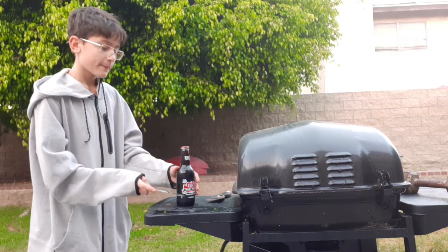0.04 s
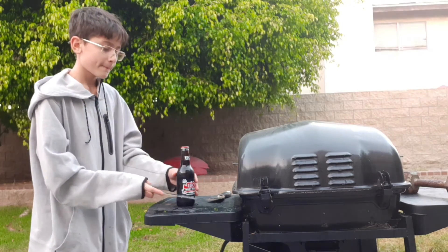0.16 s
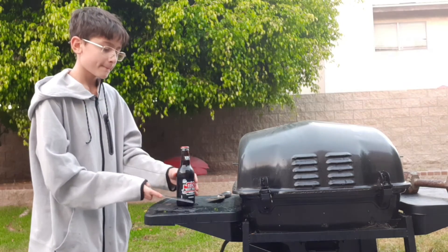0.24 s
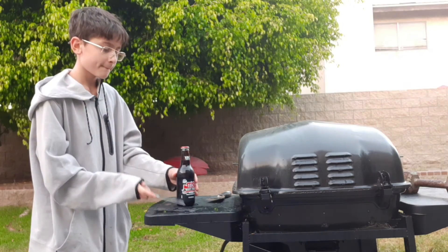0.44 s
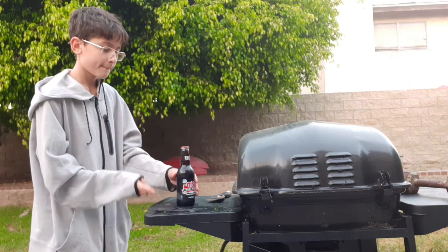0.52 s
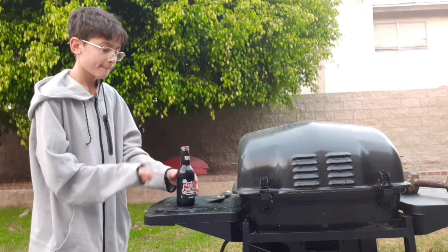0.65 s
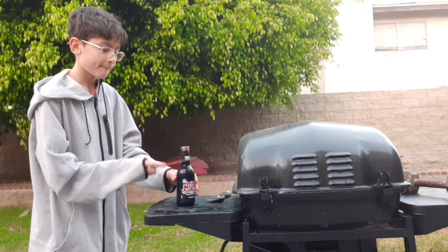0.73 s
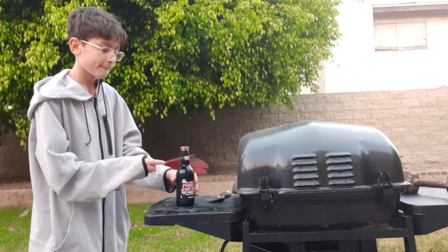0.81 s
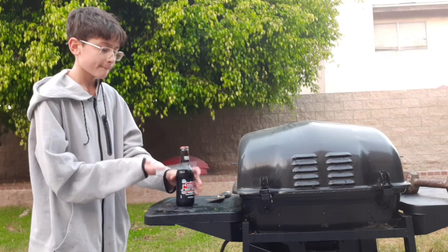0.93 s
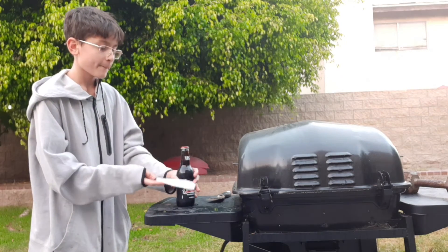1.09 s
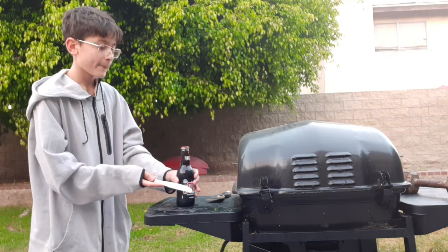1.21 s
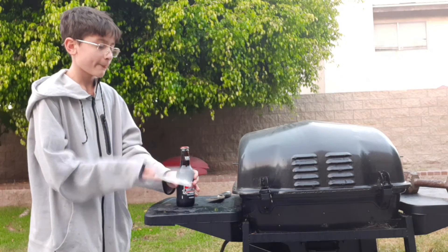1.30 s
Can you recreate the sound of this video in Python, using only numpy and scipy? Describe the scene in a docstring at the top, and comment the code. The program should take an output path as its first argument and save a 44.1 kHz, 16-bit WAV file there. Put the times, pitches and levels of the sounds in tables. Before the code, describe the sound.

Two bright clinks ring from a glass bottle tapped with a metal utensil close by. After a short pause with a faint rub, two higher clinks follow and fade over a quiet outdoor rumble.

```python
"""A glass bottle, held on a barbecue's side shelf, struck with a metal utensil: two quick blows low on
its body (the second rebounds), then two higher up. Each blow cracks, sets off a short dense shimmer
and leaves a few clear modes ringing, until the hand tightens on the low ones. Utensil and sleeve rub
lightly, the sheet-metal shelf hums, and the yard walls answer over a faint outdoor rumble."""
import sys
import numpy as np
from scipy import signal
from scipy.fft import rfft, irfft
from scipy.io import wavfile

SR = 44100
rng = np.random.default_rng(int(sys.argv[2]) if len(sys.argv) > 2 else 0)


def pcm_store(signal):
    """Save signal as 16-bit PCM."""
    levels = np.round(np.clip(np.atleast_2d(signal), -1, 1) * 32767)
    wavfile.write(sys.argv[1], SR, levels.astype(np.int16).T)


N = 59535

# utensil blows, third a rebound: t/s, ring level/dB, place (0 low, 1 high), ring tilt/(dB/oct),
# shimmer level/dB, shimmer tilt/(dB/oct), crack level/dB, ring t60 factor
BLOWS = [(0.2285, 1, 0.098, 3, -25.5, -3, -20, 0.77), (.3366, -2, 0.18, 1, -23.5, .5, -15, 0.68),
         (.3484, -10, 0, 12.5, -31.5, 2.5, -26, 0.67), (0.7604, 2, 0.93, 1, -25, -1.5, -20, 0.75),
         (.8787, -4, 0.91, -0.5, -29, -2.5, -24, 1)]
# spectrum of the dense glass modes: f/Hz, relative level struck low/dB, struck high/dB
SHIMMER_SPECTRUM = [(250.8, -20, -27), (600, -21, -21), (1050, -22, -22), (1385, -9, -12.5),
                    (2500, 2.5, -13.5), (3595, -8, -6.5), (4400, -2, -8.5), (5253, 11.5, -4.5),
                    (5440, -11.5, -13), (6400, -1.5, -6), (7490, -22, -10.5), (8500, -3.5, -15),
                    (9310, -11.5, -6.5), (9660, -11, -17), (9700, -7.5, -7.5), (11100, -29, -6),
                    (12400, -5, 1.5), (14600, -13.5, -11.5), (16000, -10, -5), (15980, -25.5, -20.5)]

TILT_PIVOT_HZ, TOP_HZ = 3500, 15400
SHIMMER_PAN_DB, BACKGROUND_PAN_DB, LEFT_LAG_S = -1.5, -2.5, 0.00003


def bottle_ring(t):
    """Clear modes: each blow partly chokes the old ring, then feeds each mode according to place."""
    # modes of bottle and utensil: f/Hz
    modes_hz = [2091.6, 2922, 2981, 4052, 4226, 4307, 4766, 5128, 5175, 5256, 5902, 6398, 7064, 8370, 8880,
                9570, 9726, 10490, 11450, 11830, 12270, 12475, 12620]
    # same modes: level struck low/dB, struck high/dB, base t60/s, L-R/dB, right lead/rad
    modes = [(-2.5, -28, 0.41, 5, 0.5), (-18.5, -54.5, 0.44, 4.5, 1.2), (-21, -38, 0.48, -3, 0.2),
             (-29, -19.5, 0.21, 2.5, -10.1), (-20, -20.5, 0.15, -5.5, 5.2), (-23, -11, 0.16, -9, 1),
             (-26, -19.5, 0.05, -6, 0.3), (-26, -31, 0.21, -3, 3.55), (-38.5, -25.5, .22, -3.5, 0),
             (-29, -32.5, 0.15, -5, 2.6), (-41.5, -35.5, 0.1, 0, 3), (-20, -15, 0.063, 2, 1.23),
             (-26, -29.5, 0.089, -2, 1), (-35, -47.5, 0.18, 2, 4.5), (-50, -35, 0.05, 2, 1),
             (-44.5, -39, 0.18, 6.5, 3.6), (-46, -51, 0.11, -4.5, 0.7), (-36.5, -35, 0.097, 4, 3.87),
             (-49.5, -35.5, 0.094, -4.5, 2.7), (-54.5, -35, 0.1493, -6, 1.7), (-40, -35, 0.13, -1, 4.5),
             (-31.5, -41.5, 0.043, -6.5, 2.5), (-44, -34.5, .14, 0.5, 3.5)]
    rise_s, contact_s, surviving_share = 0.0012, 0.0034, 0.067
    held_below_hz, loose_grip = 3500, 1.4  # looser grip at high blows: held modes ring longer
    grip_at_s, grip_t60_s = 1.036, 0.17
    grip = fade(t - grip_at_s, grip_t60_s)
    out = np.zeros((2, N))
    for hz, (low_db, high_db, t60_s, pan_db, lead_rad) in zip(modes_hz, modes):
        held = hz < held_below_hz
        swing = np.zeros(N)
        for at_s, blow_db, place, tilt_db_oct, *_, t60_factor in BLOWS:
            age_s = np.maximum(t - at_s, 0)
            db = blow_db + struck_db(hz, low_db, high_db, place, tilt_db_oct)
            decay = fade(age_s, t60_s * t60_factor * (loose_grip ** place if held else 1))
            swing *= surviving_share + (1 - surviving_share) * np.exp(-age_s / contact_s)
            swing += undb(db) * (1 - np.exp(-age_s / rise_s)) * decay
        phase_rad = 2 * np.pi * hz * t + np.array([[-lead_rad], [lead_rad]]) / 2
        out += pan(pan_db) * swing * (grip if held else 1) * np.sin(phase_rad)
    return out


def crack_and_shimmer(t):
    """Metal cracks on glass; a crowd of short-lived modes follows as shaped noise."""
    crack_t60_s, shimmer_t60_s = 0.012, 0.076
    out = np.zeros((2, N))
    for at_s, _, place, _, shimmer_db, tilt_db_oct, crack_db, _ in BLOWS:
        spectrum = [(hz, struck_db(hz, low_db, high_db, place, tilt_db_oct))
                    for hz, low_db, high_db in SHIMMER_SPECTRUM]
        shared, left, right = noise(spectrum, count=3)
        stereo = np.array([delay(shared, LEFT_LAG_S), shared]) + 0.71 * np.array([left, right])
        crack = undb(crack_db) * fade(t - at_s, crack_t60_s)
        shimmer = undb(shimmer_db) * fade(t - at_s, shimmer_t60_s)
        out += (t >= at_s) * (shimmer + crack) * stereo
    return out * pan(SHIMMER_PAN_DB)


def glass_sparkle(t, count=110):
    """Weak upper glass modes that outlast the shimmer; same pitches at every blow, levels scattered."""
    lowest_hz, mean_t60_s, gain_db, scatter_db = 3195, 0.17, -14, 2.5
    age_s = t[:SR // 2]
    hz_draw, t60_draw, start_cycles, lead_draw = rng.random((count, 4)).T
    hz = lowest_hz + (TOP_HZ - lowest_hz) * (np.arange(count) + hz_draw) / count
    decay = fade(age_s, mean_t60_s * (0.5 + t60_draw[:, None]))
    waves = decay * np.exp(2j * np.pi * (hz[:, None] * age_s + start_cycles[:, None]))
    left_rad = 2 * (lead_draw - 0.5) - 2 * np.pi * hz * LEFT_LAG_S
    stereo = np.array([np.exp(1j * left_rad), np.ones(count)])
    points_hz, *levels_db = np.array(SHIMMER_SPECTRUM).T
    low_db, high_db = (np.interp(hz, points_hz, db) for db in levels_db)
    out = np.zeros((2, N + SR))
    for at_s, _, place, _, shimmer_db, tilt_db_oct, _, _ in BLOWS:
        db = gain_db + shimmer_db + struck_db(hz, low_db, high_db, place, tilt_db_oct)
        gains = undb(db + scatter_db * rng.standard_normal(count))
        start = int(at_s * SR)
        out[:, start:start + len(age_s)] += ((stereo * gains) @ waves).imag
    return out[:, :N] * pan(SHIMMER_PAN_DB)


def struck_db(hz, low_db, high_db, place, tilt_db_oct):
    """Mode level: blend of low and high strike, tilted by the blow."""
    return low_db + place * (high_db - low_db) + tilt_db_oct * np.log2(hz / TILT_PIVOT_HZ)


def rubs(t):
    """Utensil and sleeve brush lightly: swells of band noise."""
    # brushes: mid t/s, length/s, f/Hz, width/oct, level/dB
    brushes = [(0.058, .16, 4070, 0.3, -63), (0.131, 0.12, 2160, 0.15, -58), (.156, .01, 3340, 0.23, -49.5),
               (0.151, .008, 6300, 0.466, -64), (0.187, .07, 2350, 0.13, -57),
               (0.188, .09, 7050, .45, -72.5), (0.499, 0.16, 2448, 0.17, -46.5),
               (.69, .14, 7010, 0.53, -78)]
    out = np.zeros((2, N))
    for mid_s, length_s, hz, width_oct, db in brushes:
        edge, skirt = 2 ** (width_oct / 2), 2 ** (2 * width_oct)
        band = noise([(hz / 2, -40), (hz / skirt, -18), (hz / edge, 0),
                      (hz * edge, 0), (hz * skirt, -18), (hz * 2, -40)])
        swell = np.cos(np.pi * np.clip((t - mid_s) / length_s, -0.5, 0.5))
        out += undb(db) * band * swell
    return out


def yard_echo(x, t):
    """Near surfaces give single echoes; walls and foliage scatter a short tail."""
    # near reflections: delay/s, left gain, right gain
    echoes = [(.0052, 0.066, 0.055), (.0105, 0.071, 0.41), (.028, 0.05, 0.083)]
    # tail colour: f/Hz, level/dB
    tail_spectrum = [(300, -2.5), (1300, 4.5), (1850, 0.5), (2090, -9), (2400, 2.5), (3000, -2.5),
                     (4300, -3), (6000, -1.5), (8000, -3.5), (15000, -2.5)]
    tail_db, onset_s, split_hz = -9.5, 0.004, 6000
    near = sum(np.array([[left], [right]]) * delay(x, lag_s) for lag_s, left, right in echoes)
    white = rng.standard_normal((2, N))
    low = signal.sosfilt(signal.butter(2, split_hz, fs=SR, output="sos"), white)
    high = signal.sosfilt(signal.butter(2, split_hz, "high", fs=SR, output="sos"), white)
    tail = low * fade(t, t60_s=0.43) - high * fade(t, t60_s=0.28)
    tail *= 1 - np.exp(-t / onset_s)
    tail = colour(tail / np.sqrt(np.sum(tail ** 2) / 2), tail_spectrum)
    return near + undb(tail_db) * signal.fftconvolve(x, tail, axes=1)[:, :N]


def shelf_hum(t):
    """Blows stir the shelf's many low modes; high blows rock the bottle and stir them more."""
    # sheet-metal hum: f/Hz, relative level/dB
    spectrum = [(90, -27.5), (160, -1.5), (350, 0), (650, 2.5), (900, -1), (1300, -5.5), (2500, -23.5)]
    gain_db, high_blow_db, t60_s = -53.5, 7, 0.98
    power = sum((undb(db + place * high_blow_db) * (t >= at_s) * fade(t - at_s, t60_s)) ** 2
                for at_s, db, place, *_ in BLOWS)
    mid, side = noise(spectrum)
    stereo = mid + 0.26 * np.array([side, -side])
    return undb(gain_db) * np.sqrt(power) * pan(BACKGROUND_PAN_DB) * stereo


def outdoor_rumble():
    """Distant rumble, alike in both ears in the bass, wider above."""
    # rumble: f/Hz, relative level/dB
    spectrum = [(20, -35), (33, -17.5), (48, 5.5), (68, -7.5), (92, 3.5), (115, -7), (170, -8.5),
                (300, -18.5), (750, -19.5), (1200, -28), (2200, -32), (3200, -41), (4500, -41),
                (8000, -56.5), (15000, -49.5)]
    gain_db, wide_above_hz = -50, 690
    mid, side = noise(spectrum)
    side = signal.sosfilt(signal.butter(1, wide_above_hz, "high", fs=SR, output="sos"), side)
    return undb(gain_db) * pan(BACKGROUND_PAN_DB) * (mid + 0.86 * np.array([side, -side]))


def undb(db):
    """dB to gain."""
    return 10 ** (np.asarray(db) / 20)


def fade(t, t60_s):
    """Exponential decay; 1 before t = 0."""
    return np.exp(-np.log(1000) * np.maximum(t, 0) / t60_s)


def pan(db):
    """Stereo gains for L-R/dB."""
    return undb(np.array([[db], [-db]]) / 2)


def colour(x, points):
    """Minimum-phase filter through (f/Hz, level/dB) points."""
    hz, db = np.array(points).T
    bins_hz = np.maximum(np.fft.rfftfreq(2 * N, 1 / SR), 1)
    gain = undb(np.interp(np.log(bins_hz), np.log(hz), db))
    cepstrum = irfft(np.log(gain))
    cepstrum[1:N] *= 2
    cepstrum[N + 1:] = 0
    return irfft(rfft(x, 2 * N) * np.exp(rfft(cepstrum)))[..., :N]


def noise(points, count=2):
    """Independent coloured noises, unit RMS."""
    x = colour(rng.standard_normal((count, N)), points)
    return x / x.std()


def delay(x, lag_s):
    """Fractional-sample delay."""
    bins_hz = np.fft.rfftfreq(2 * N, 1 / SR)
    return irfft(rfft(x, 2 * N) * np.exp(-2j * np.pi * bins_hz * lag_s))[..., :N]


def scene():
    """Bottle clinks and their echo over shelf hum and rumble."""
    t = np.arange(N) / SR
    bottle = bottle_ring(t) + crack_and_shimmer(t) + glass_sparkle(t) + rubs(t)
    return bottle + yard_echo(bottle, t) + shelf_hum(t) + outdoor_rumble()


def record(dry):
    """Hard limit at full scale, then steep low-pass."""
    lowpass = signal.ellip(8, 0.2, 80, TOP_HZ, fs=SR, output="sos")
    return signal.sosfilt(lowpass, np.clip(dry, -1, 1))


dry = scene()
out = record(dry)
pcm_store(out)
```